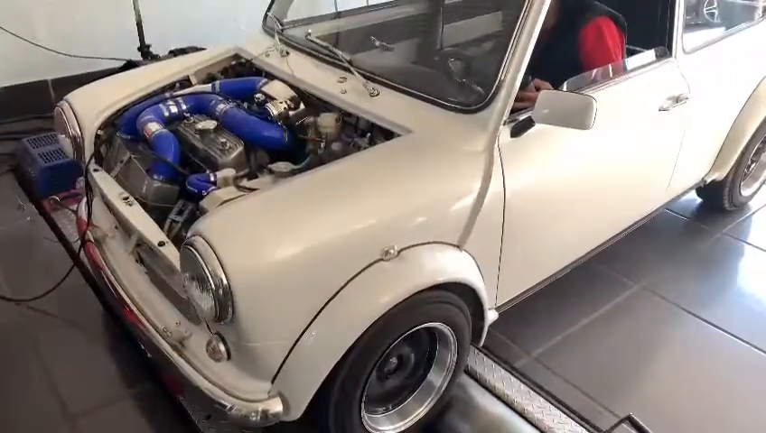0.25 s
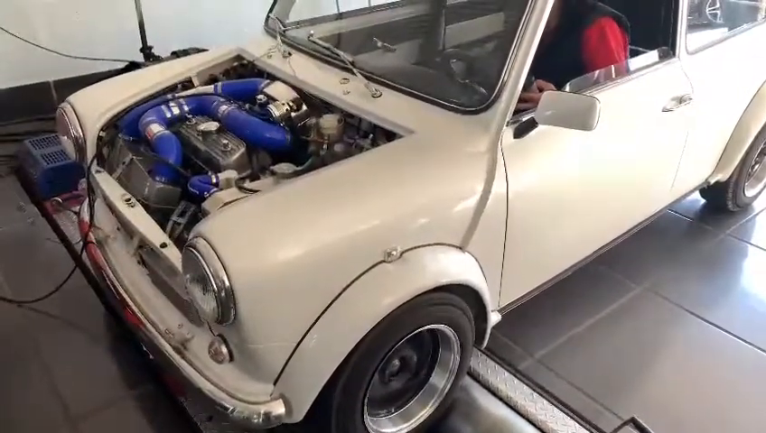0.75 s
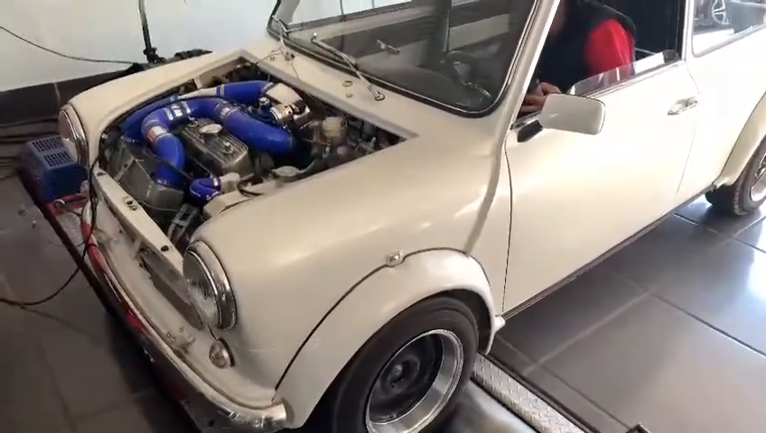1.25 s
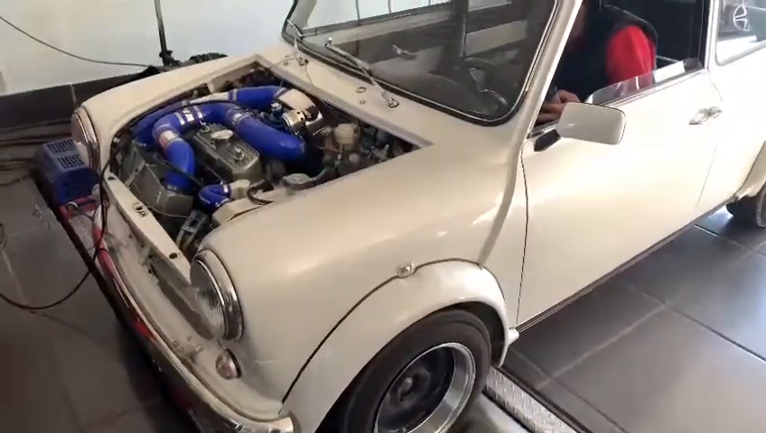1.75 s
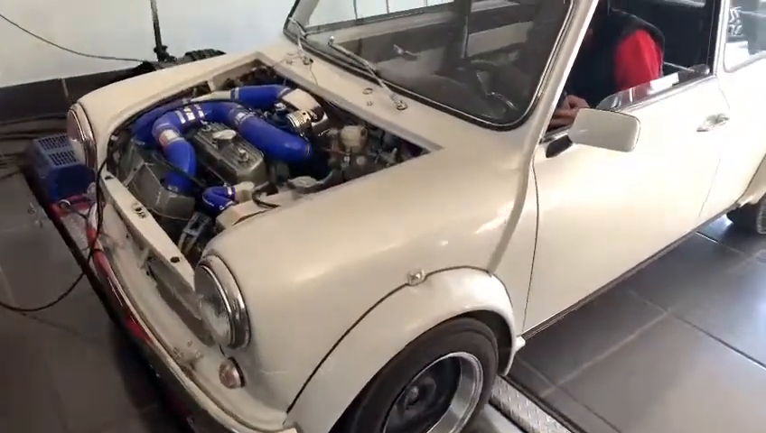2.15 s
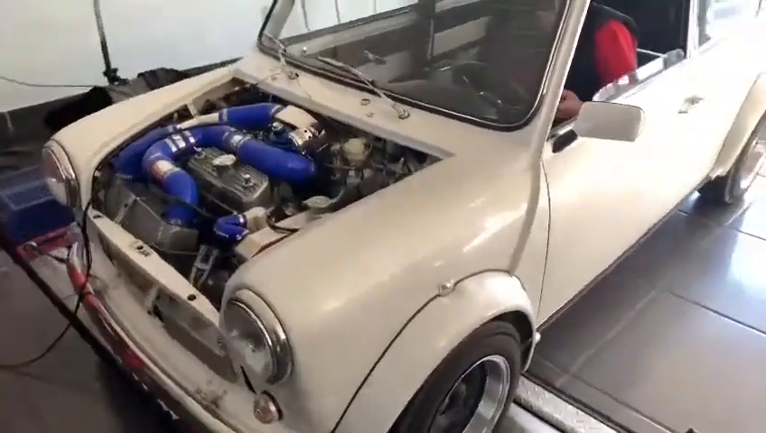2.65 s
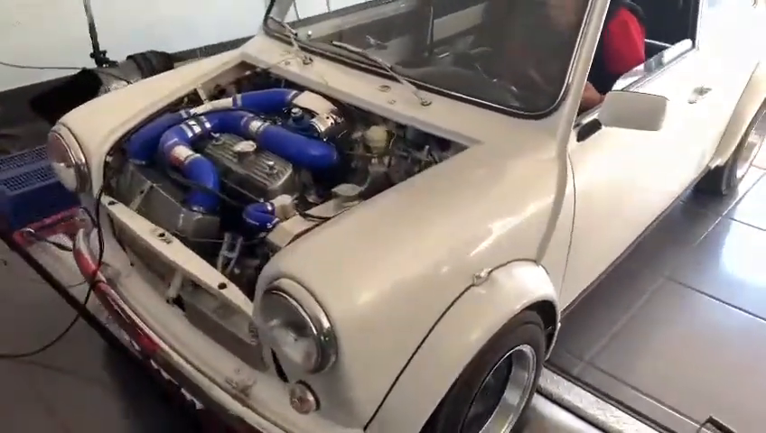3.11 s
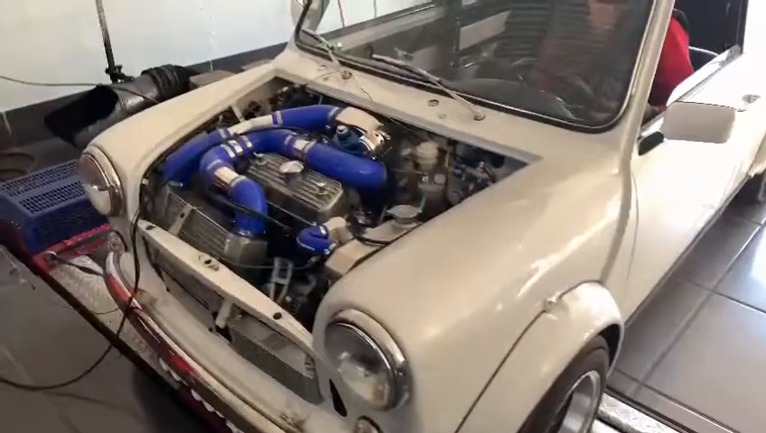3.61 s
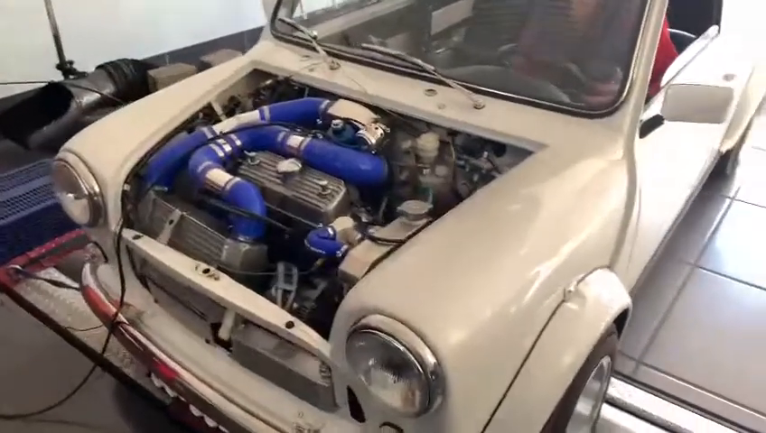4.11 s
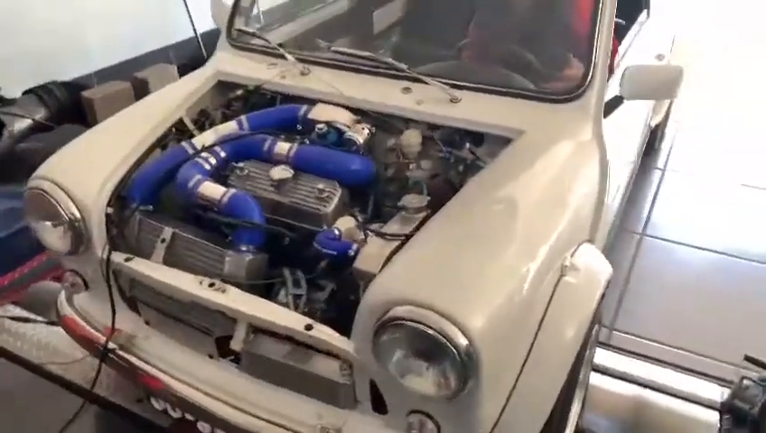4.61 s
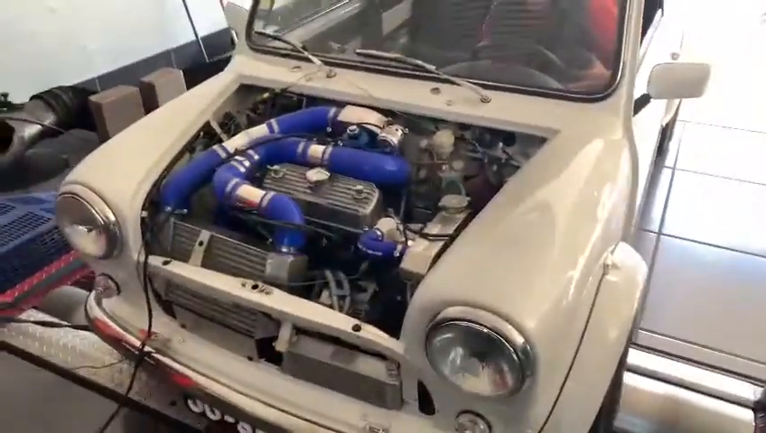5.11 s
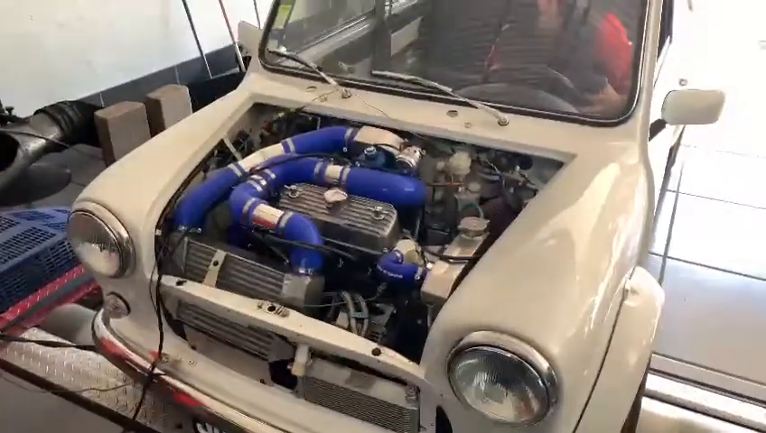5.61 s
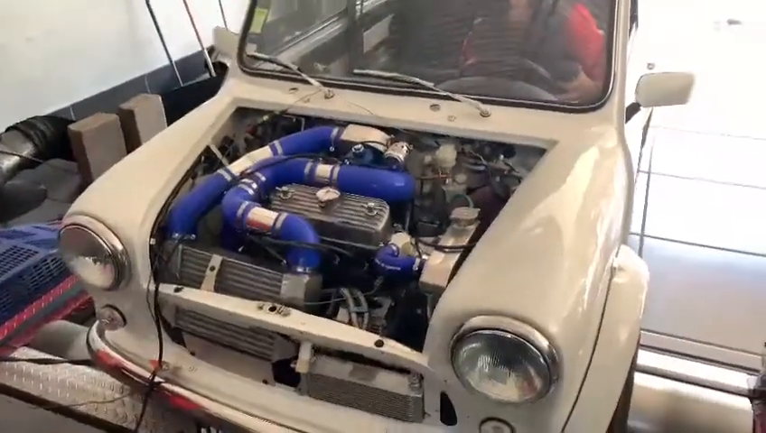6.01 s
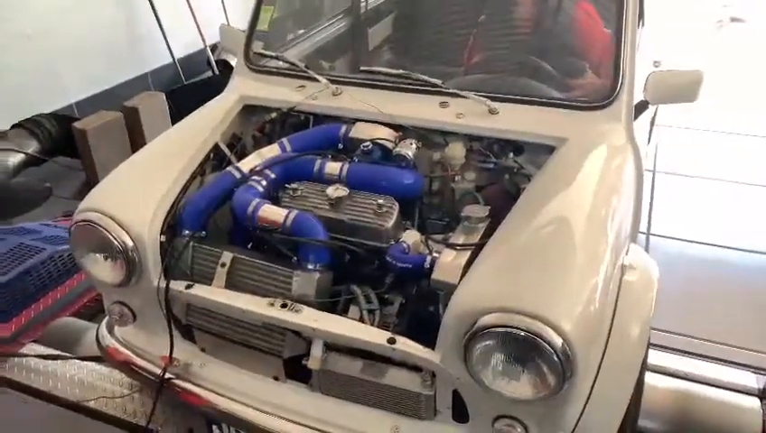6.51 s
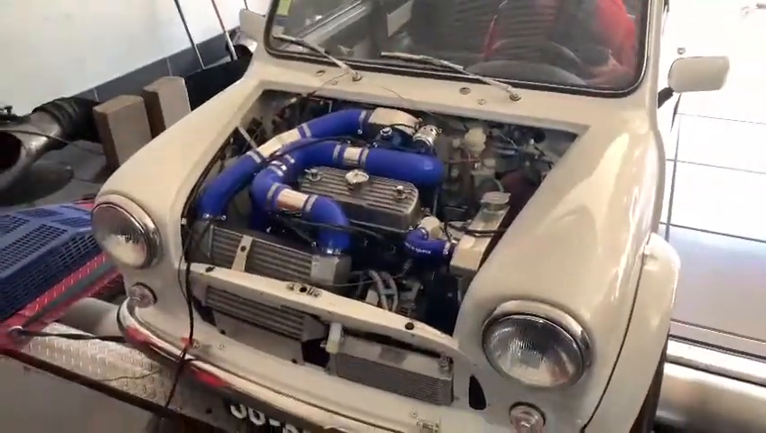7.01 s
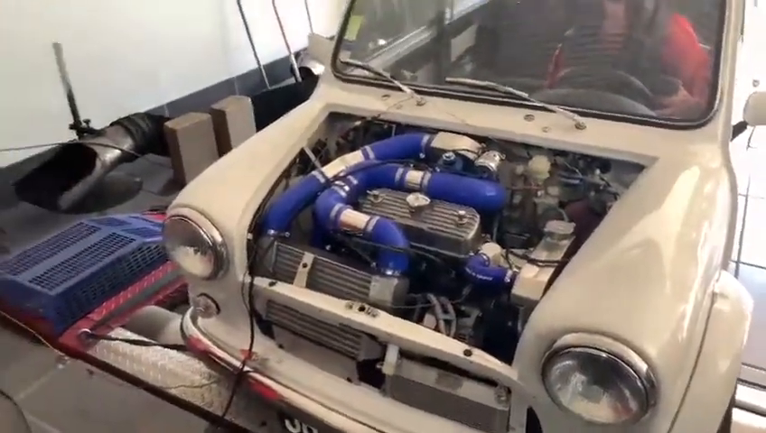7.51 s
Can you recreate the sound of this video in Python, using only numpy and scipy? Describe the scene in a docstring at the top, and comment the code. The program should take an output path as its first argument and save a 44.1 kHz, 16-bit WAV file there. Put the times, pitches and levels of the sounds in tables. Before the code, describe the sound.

Continuous close-up of a small four-cylinder engine idling briskly, never revving. Its rapid exhaust pulses fuse into a buzzing hum, with whirring gears, belt-drive tones, broadband mechanical rush and quick ticking clatter. A small stereo microphone starts beside the car, walks around the corner and settles in front, where the sound is a little less roary, brighter and hissier, with a slow beating hum.

```python
"""A small four-cylinder engine, bonnet off, runs at a fast idle in a tiled workshop, heard by two ports.
At first the listener stands beside the car: crank-locked sines make exhaust thump, gear whine and belt-drive
tones beating with crank orders; shaped noise makes roar and belt hiss; repeated noise patterns make clatter.
From 2.2 s the listener walks to the front, there at 5.5 s: single tones briefly swell or dip on the way,
the roar sinks a little and the hiss grows. Levels and port leads still drift until 7.6 s."""
import sys
import numpy as np
from scipy import signal
from scipy.fft import irfft
from scipy.io import wavfile
from scipy.ndimage import uniform_filter1d

SR = 44100
rng = np.random.default_rng(int(sys.argv[2]) if len(sys.argv) > 2 else 0)


def wav_out(sig):
    """Save sig, one row per channel (or a flat mono array), as 16-bit PCM at SR to the path in sys.argv[1]."""
    wavfile.write(sys.argv[1], SR, np.round(np.clip(np.atleast_2d(sig).T, -1, 1) * 32767).astype(np.int16))


N = 341775

# engine speed: (time [s], rate [firings/s])
SPEED = [(0.0, 41.603), (0.78, 41.61), (1.55, 41.584), (2.33, 41.579), (3.1, 41.565), (3.88, 41.582),
         (4.65, 41.62), (5.42, 41.645), (6.2, 41.671), (6.98, 41.646), (7.75, 41.617)]
# walk: leaving the car's side, at the wing, at the corner, in front, end: (time [s], ...)
STOPS_S = (2.2, 3.3, 4.4, 5.5, 7.6)

# exhaust orders: (firing multiple, ...)
EXHAUST_ORDERS = (2, 3, 4, 5, 6, 7, 8, 9, 10, 14)
# exhaust note, one row a stop: (level of each order [dB], ...)
EXHAUST_DB = [(-26, -29, -22, -34.5, -53, -41, -32, -54.5, -38.5, -36),
              (-31, -29.5, -19.5, -29, -33, -34.5, -30.5, -47.5, -38.5, -58),
              (-37, -31, -18.5, -29.5, -33.5, -31.5, -38.5, -46, -40.5, -45),
              (-47, -30, -30, -31.5, -34.5, -35, -34, -41, -46, -42),
              (-48, -30, -24, -34.5, -39.5, -36, -31.5, -43.5, -48, -43)]
# exhaust at the ports, one row an order:
# (side left-right [dB], side left lead [rad], front left-right [dB], front left lead [rad])
EXHAUST_EARS = [(-5, -.4, -10, -.6), (-3, -.1, -4, .3), (-3, -.2, -2, .9), (-1, -1.3, -4, -.5),
                (-1, .5, -5, -1.2), (-8, -1.2, -6, -.1), (-1, -.7, -5, .7), (-2, 0, -2, 0),
                (-1, 2.7, -4, -2.2), (-3, -.1, -1, 0)]
# thump shape, one row a stop: (turn [rad], delay [rad/order], smear [rad/order^2])
SMEAR = [(-3.5, 2.78, .4), (-4.2, 1.6, -.2), (-4.5, 1.36, -.33), (-4.3, 1.25, -.42), (-4.1, 1.25, -.44)]
# beyond this many orders above the strongest, smear goes from square to this slope
SMEAR_KNEE_ORDERS, SMEAR_SLOPE = 4, 6

# noise levels along the walk, before each source's make-up gain: (time [s], roar [dB], hiss [dB])
WALK = [(.1, -38, -43), (1.7, -37.5, -42.5), (2.6, -37.5, -40.5), (3.9, -38.5, -39.5), (5.2, -40, -38.5),
        (6.4, -40, -38), (7.65, -39.5, -38)]
# relative roar spectra beside the car, at its corner, in front: (frequency [Hz], density [dB per Hz])
ROAR_SIDE = [(15, -60), (25, -22), (58, -16), (165, -12.5), (208, -18.5), (270, -10.5), (342, -12),
             (394, -21.5), (575, -14), (879, -21.5), (1310, -18), (1620, -24.5), (1910, -18), (2370, -22),
             (5800, -28.5), (7000, -37), (9100, -96), (15400, -120)]
ROAR_CORNER = [(15, -68), (25, -18), (173, -9.5), (304, -9.5), (342, -17), (413, -13), (819, -23),
               (944, -17), (2310, -20.5), (2930, -21), (3370, -23.5), (5940, -23.5), (7000, 0), (9100, -83),
               (15400, -120)]
ROAR_FRONT = [(15, -60), (25, -18), (140, -7.5), (334, -11), (413, -17), (499, -11), (632, -16), (879, -18),
              (966, -13.5), (1040, -14.5), (1590, -18.5), (1910, -16), (2370, -18.5), (3880, -23),
              (4750, -19.5), (5550, -21.5), (7000, -18), (9100, -75), (15400, -120)]
# engine-bay resonances: (frequency [Hz], width [Hz], boost [dB])
RINGS = [(530, 25, 3), (1190, 250, 0), (1360, 200, 1), (2145, 62, 6), (2900, 730, 6.5), (3500, 180, 5),
         (3830, 250, 7.5), (5760, 21, 20)]
# roar at the ports: (frequency [Hz], likeness [0-1], left lead [rad], left-right [dB])
ROAR_PAIR = [(45, .85, 0, -1), (100, .68, -.1, -1.7), (200, .65, -.3, -3), (350, .75, .3, -3.5),
             (450, .5, .4, -1), (1100, .55, .6, 2), (1700, .2, 1.8, 0), (2400, .3, 3.3, -1),
             (2900, .35, 4.3, -1.5), (3500, .5, 3.3, -1), (4400, .55, 6.4, -1.5), (5600, .25, 4.6, -3.5),
             (6300, .4, 3.4, -1)]
ROAR_TOP_HZ = 6250  # hiss takes over above

TEETH, TOOTH_ORDERS = 23, (1, 2, 3, 4, 5, 6)  # tooth contacts per firing, their multiples
# gear whine, one row a stop: (level of each tooth multiple [dB], ...)
GEARS_DB = [(-46.5, -38, -34.5, -43, -47, -47), (-35.5, -33, -35.5, -48, -50, -48),
            (-30.5, -32.5, -37, -36, -49, -45), (-31.5, -33.5, -37.5, -42.5, -50, -45),
            (-28.5, -38, -41.5, -39.5, -45, -47)]
# gear balance, rows beside the car and in front: (left-right of each tooth multiple [dB], ...)
GEAR_PANS_DB = [(-1, -1, -2, -3, -2, -3), (1, -3, -2, -2, -2, -5)]
# gear phase, one row a stop: (left lead of each tooth multiple [rad], ...)
GEAR_LEADS_RAD = [(.9, -2.2, -2, 1.2, 0, .6), (.6, -2.8, -1, 2.2, 0, -1.7), (1.3, -3.1, -.9, 4.6, 0, -1.8),
                  (0, -5.3, -1.8, 4.6, 0, -3), (.4, -5.1, .2, 5.8, 0, -4)]
WOBBLE_TURNS = .309  # slow-shaft turns per firing
# orders that shake the gear train: (firing multiple, ...)
KICK_ORDERS = (1, 2, 3, 6)
# rock by each of those orders: (swing of the first tooth tone [rad], ...)
KICK_RAD = (0.028, 0.046, 0.031, 0.05)

# belt-drive tones and the two crank orders, 12 and 13.5, that beat with them: (firing multiple, ...)
BEATING_RATIOS = (12.048, 12, 13.595, 13.5, 16.368, 27.755)
# the same tones, one row a stop: (level of each tone [dB], ...)
BEATING_DB = [(-40, -50.5, -40, -67, -44.5, -44), (-39, -57, -38.5, -65, -53, -41),
              (-45, -67, -44.5, -48, -41, -41), (-28.5, -40, -35, -38, -42.5, -41),
              (-28, -40, -36, -48, -45, -40)]
# the same tones at the ports, one row a tone:
# (side left-right [dB], side left lead [rad], front left-right [dB], front left lead [rad])
BEATING_EARS = [(-1, 2.0, 0, .7), (1, .8, 0, .7), (3, .4, -3, -.1), (0, .5, 1, 0), (-1, .2, -5, .5),
                (2, 2.5, 2, .7)]
# a crest of each tone at the right port, wavering aside: (time [s], ...)
BEATING_CRESTS_S = (7.05, 7.05, 6.45, 6.45, 1, 1)

# relative hiss spectrum: (frequency [Hz], density [dB per Hz])
HISS = [(6000, -40), (6300, -2), (6630, 3), (6900, -1), (7150, -2), (7550, 1.5), (7900, -1), (8700, 0),
        (9700, -1.5), (10200, -4), (11000, -5.5), (11600, -8)]
# hiss at the ports, opposed or in step by pitch: (frequency [Hz], likeness [-1 to 1])
HISS_PAIR = [(6300, -.3), (6750, -.5), (6900, -1), (7500, -.98), (8150, 0), (8600, .99), (10100, 1),
             (10450, 0), (10900, -1)]
BELT_TURNS = .767  # pulley turns per firing

CLATTER_RATES = (WOBBLE_TURNS, .5, 1)  # slow shaft, crank, each firing: repeats per firing
# clatter, one row a part: (level [dB], spread of partials [dB], fade within a turn [neper])
CLATTER = [(-37, 5.5, 1.3), (-45, 5, .6), (-41, 3.5, 1.5)]
# relative clatter spectra, one list a part: (frequency [Hz], density [dB per Hz])
CLATTER_COLOURS = [
    [(300, -18), (420, 2), (600, 1.5), (900, 3.5), (1300, 0), (2000, -17.5), (3500, -6), (6200, -17)],
    [(300, -30), (420, -9), (700, 3), (1500, -22), (3000, -7), (6200, -6)],
    [(500, -28), (700, -4.5), (1200, 0.5), (2000, -2.5), (2900, -8), (4000, -13), (6200, 1)],
]
PLAY_S = 3e-5  # scale of early or late knocks
KNOCK_RISE_TURNS = .03  # time constant, in turns of the part

# faint shaft tones: (firing multiple, level beside the car [dB], level in front [dB])
FAINT = [(3.5, -49, -41), (11.0, -50, -45), (11.5, -41, -50), (12.97, -47, -46), (16.0, -46, -52),
         (17.0, -47, -54), (18.0, -48, -50), (20.0, -48, -46), (25.0, -44, -45), (28.08, -48, -45),
         (31.51, -46, -52), (32.44, -44, -47), (44.79, -51, -48), (49, -55, -51), (50, -55, -51),
         (51.75, -47, -49), (60, -55, -51), (61, -55, -52), (63, -54, -51), (71, -51, -49), (72, -50, -46),
         (75, -52, -48), (94, -53, -50)]
# brief swells and dips of tones near a pitch, at each port:
# (time [s], pitch [Hz], half length to 1/e [s], left change [dB], right change [dB])
SWELLS = [(2.22, 2872, 0.55, -5, -7.5), (2.54, 681, 0.18, 12, 7), (2.56, 1915, 0.47, 5, 4),
          (2.7, 1915, 0.2, 0, -16), (2.15, 3830, .3, 0, -2), (2.8, 620, 0.23, 2, -6),
          (2.93, 958, 0.18, 5, -1), (2.65, 958, .25, -5, -6), (4.3, 5745, .4, -7, -2),
          (4.87, 310, 0.25, 6, 5), (3.3, 478, 0.4, 3, 3), (2.61, 2872, .15, 4, 5), (3.3, 457, 0.13, 9, 7),
          (3.7, 360, 0.15, 11, 10), (3.5, 416, 0.8, 5, 2.5), (3.8, 390, .12, 6, 3),
          (3.2, 333, 0.77, -2.5, 4), (4.3, 333, 0.4, -16, -18), (3.7, 166, 0.74, -8.5, -1.5),
          (4.55, 166, 0.45, -21, -2.5), (4.5, 2872, 0.13, 5.5, 8), (4.78, 681, 0.14, 11, 4.5),
          (4.88, 958, 0.43, -7.5, -16), (5.04, 502, 0.2, 9.5, 6.5), (5.01, 1915, 0.35, 8.5, -2),
          (5.44, 2872, 0.37, -6.5, -9), (4.9, 3830, 0.48, -2.5, -7), (5.9, 681, 0.13, -2, -7),
          (4.6, 1915, .2, -7, -3.5), (2.03, 958, 0.26, 5, 8.5), (4.24, 958, 0.33, 1, -1.5),
          (3.28, 410, .13, 10, 10), (4.85, 2872, .2, -2, 0.5)]
EDGE_HZ = 11750  # recorder's band limit


def exhaust():
    """One thump a firing: pipe and floor turn, delay and smear its orders around the strongest."""
    turn, delay, smear = np.transpose(SMEAR)[:, :, None]
    step = np.array(EXHAUST_ORDERS) - 4  # from the strongest order
    beyond = (step - SMEAR_KNEE_ORDERS).clip(0)
    bend = np.minimum(step ** 2, SMEAR_KNEE_ORDERS ** 2 + SMEAR_SLOPE * beyond)
    start = np.unwrap(turn + delay * step + smear * bend, axis=0)  # slide the short way round
    return tones(EXHAUST_ORDERS, EXHAUST_DB, *paired(EXHAUST_EARS), walked(start),
                 waver_db=0.49, waver_rad=0.03, waver_hz=20)


def roar_shape(hz, t):
    """Roar spectrum [dB]: blend of three places along the walk, plus engine-bay rings."""
    places = (ROAR_SIDE, ROAR_CORNER, ROAR_FRONT)
    place_s = [STOPS_S[0], np.mean(STOPS_S[:-1]), STOPS_S[-2]]
    shares = [np.interp(t, place_s, one) for one in np.eye(len(places))]
    rings = sum(boost / (1 + (2 * (hz - f) / width) ** 2) for f, width, boost in RINGS)
    top_cut = 10 * np.log10(1 + (hz / ROAR_TOP_HZ) ** 120)
    blend = sum(across(p, hz).T * share for p, share in zip(places, shares))
    return blend + (rings - top_cut)[:, None] + along(WALK, t)[0]


def roar():
    """Intake, fan and block noise, ringing in the engine bay and puffing with each firing."""
    def same(hz):
        return across(ROAR_PAIR, hz)[0]

    def turn(hz):
        _, lead, pan_db = across(ROAR_PAIR, hz)
        return amp(pan_db) * np.exp(1j * lead)

    sound = noise(roar_shape, same, turn, patchy_db=2.5, comb_db=1.6)
    turns = 2 * np.pi * firings()
    puff = 1 + 0.012 * np.cos(turns) + 0.0092 * np.cos(2 * turns) + 0.038 * np.cos(4 * turns)
    puff = puff + 0.026 * np.cos(WOBBLE_TURNS * turns)
    return amp(12.5) * evened(sound) * amp(np.mean(WALK, axis=0)[1]) * puff


def gears():
    """Tooth-contact whine, fuzzy from turn-to-turn variation; firings and a slow shaft rock the teeth."""
    turns, order = 2 * np.pi * firings(), np.array(TOOTH_ORDERS)
    kicks = sum(rad * np.cos(k * turns + rng.uniform(0, 2 * np.pi)) for k, rad in zip(KICK_ORDERS, KICK_RAD))
    backlash = 0.084 * waver(count=1, hz=60.05)[0]  # shakes all multiples together
    rock_rad = 0.22 * np.cos(WOBBLE_TURNS * turns) + kicks + backlash
    start = rng.uniform(0, 2 * np.pi, (len(order), 1)) + order[:, None] * rock_rad
    slow_load = 0.15 * np.cos(WOBBLE_TURNS * turns + rng.uniform(0, 2 * np.pi))
    load = 1 + slow_load + 0.12 * np.cos(turns)
    return load * tones(TEETH * order, GEARS_DB, side_to_front(*GEAR_PANS_DB), GEAR_LEADS_RAD, start,
                        waver_db=1.5, waver_rad=0.17, waver_hz=22.12)


def beating_tones():
    """Belt-drive tones and the two crank orders that beat with them."""
    crest_firings = np.interp(BEATING_CRESTS_S, np.arange(N) / SR, firings())
    start = -2 * np.pi * np.multiply(BEATING_RATIOS, crest_firings)
    return tones(BEATING_RATIOS, BEATING_DB, *paired(BEATING_EARS), start,
                 waver_db=0.86, waver_rad=0.19, waver_hz=7.1)


def hiss():
    """Belt noise, throbbing with each pulley turn and less with each firing."""
    def shape(hz, t):
        return across(HISS, hz).T + along(WALK, t)[1]

    def same(hz):
        return across(HISS_PAIR, hz)[0]

    sound = noise(shape, same, np.ones_like, patchy_db=2.0, comb_db=-4.0)
    turns = 2 * np.pi * firings()
    belt = BELT_TURNS * turns
    throb = 1 + 0.09 * np.cos(belt) + 0.021 * np.cos(2 * belt) + 0.023 * np.cos(turns)
    return amp(6.5) * evened(sound) * amp(np.mean(WALK, axis=0)[2]) * throb


def clatter():
    """Each turning part repeats a random knocking pattern; each stop has its own, blended along the walk."""
    turns, out, size = firings(), np.zeros((2, N)), 16384  # size: points per pattern
    shares = np.sqrt(walked(np.eye(len(STOPS_S))))  # equal-power blend between stops
    late = turns + PLAY_S * SPEED[0][1] * waver(count=1, hz=18)[0]  # play in loose parts
    phase = np.arange(size) / size
    for rate, (db, spread_db, fade), colour in zip(CLATTER_RATES, CLATTER, CLATTER_COLOURS):
        hz = np.arange(size // 2 + 1) * rate * SPEED[0][1]
        same, lead, pan_db = across(ROAR_PAIR, hz)
        a, b, c, d, uneven = rng.standard_normal((5, len(STOPS_S), len(hz)))
        right = a + 1j * b
        left = same * right + np.sqrt(1 - same ** 2) * (c + 1j * d)
        left = left * amp(pan_db) * np.exp(1j * lead)
        partials = (hz < ROAR_TOP_HZ) * amp(across(colour, hz)[0] + spread_db * uneven)
        knock = irfft(np.array([left, right]) * partials)
        shape = np.exp(-fade * phase) + (np.exp(-fade) - 1) * np.exp(-phase / KNOCK_RISE_TURNS)
        knock = evened(knock * shape).astype(np.float32)
        place = (rate * late % 1 * size).astype(int)
        out += amp(db) * np.einsum("csn,sn->cn", knock[:, :, place], shares)
    return out


def faint_tones():
    """Weak orders and sidebands, wavering, with the roar's port balance and scattered leads."""
    multiple, beside, front = np.transpose(FAINT)
    _, lead, pan_db = across(ROAR_PAIR, multiple * SPEED[0][1])
    lead = lead + 2.02 * rng.standard_normal((len(STOPS_S), len(FAINT)))
    start = rng.uniform(0, 2 * np.pi, len(FAINT))
    return tones(multiple, side_to_front(beside, front), side_to_front(pan_db, pan_db), lead, start,
                 waver_db=0.22, waver_rad=0.095, waver_hz=10)


def tones(multiples, levels, pans, leads, start, waver_db, waver_rad, waver_hz):
    """Crank-locked sines, each with its own level along the walk and its own way to both ports."""
    turns, out = firings(), np.zeros((2, N))
    swings, slips = waver(2 * len(multiples), waver_hz).reshape(2, -1, N)
    rows = zip(multiples, walked(levels), walked(pans), walked(leads), start, swings, slips)
    for k, db, pan_db, lead, rad, swing, slip in rows:
        fuzz = (k / multiples[0]) ** 0.53  # higher multiples magnify the same unevenness
        angle = 2 * np.pi * k * turns + rad + waver_rad * fuzz * slip
        pan = amp(pan_db)
        right = np.sqrt(2 / (1 + pan ** 2))  # keeps the mean power of both ports
        level_db = db + waver_db * fuzz * swing + swells(k * SPEED[0][1])
        size = np.sqrt(2) * amp(level_db) * right  # levels are RMS
        out += size * np.array([pan * np.cos(angle + lead), np.cos(angle)])
    return out


def swells(hz):
    """Brief swells and dips [dB] at the left and right port for a tone at hz."""
    t, out = np.arange(N) / SR, 0
    for s, swell_hz, half, *db in SWELLS:
        if abs(np.log(swell_hz / hz)) < .008:
            out = out + np.outer(db, np.exp(-((t - s) / half) ** 2))
    return out


def noise(shape, same, turn, patchy_db, comb_db):
    """Two-port noise from random short-time spectra; shape(hz, t) gives dB."""
    frames, hz = N // 512 + 5, np.fft.rfftfreq(2048, 1 / SR)
    a, b, c, d, patches, comb = rng.standard_normal((frames, 1025, 6)).T  # each (frequency, frame)
    patches = uniform_filter1d(uniform_filter1d(patches, size=8, axis=0), size=2, axis=1)
    comb = uniform_filter1d(uniform_filter1d(comb, size=5, axis=0), size=90, axis=1)
    flicker = patchy_db * (1 + 0.2 * np.log(1 + hz / 2000))[:, None] * evened(patches)  # more in the treble
    ripple = comb_db * evened(comb)  # narrow random peaks and dips, shifting slowly
    same, right = np.clip(same(hz), -1, 1)[:, None], a + 1j * b
    left = (same * right + np.sqrt(1 - same ** 2) * (c + 1j * d)) * turn(hz)[:, None]
    level_db = shape(hz, np.arange(frames) * 512 / SR) + flicker + ripple
    spectra = np.array([left, right]) * amp(level_db)
    return signal.istft(spectra, nperseg=2048, noverlap=1536)[1][:, :N]


def firings():
    """Firing cycles completed at each sample."""
    return np.cumsum(along(SPEED, np.arange(N) / SR)[0]) / SR


def waver(count, hz):
    """Random drifts, one a row: lines between unit-variance knots, about 2 * hz knots a second."""
    steps = round(N / SR * 2 * hz) + 2
    knots = rng.standard_normal((count, steps))
    place = np.linspace(0, steps - 1, N)
    return np.array([np.interp(place, np.arange(steps), row) for row in knots])


def walked(rows):
    """Every column of a table with one row a stop, read at each sample."""
    return along(np.column_stack([STOPS_S, rows]), np.arange(N) / SR)


def side_to_front(beside, front):
    """Rows for the stops: even steps from the car's side to its front, then held."""
    return np.vstack([np.linspace(beside, front, len(STOPS_S) - 1), front])


def paired(ears):
    """Left-right dB and left lead at each stop."""
    pan_side, lead_side, pan_front, lead_front = np.transpose(ears)
    return side_to_front(pan_side, pan_front), side_to_front(lead_side, lead_front)


def along(table, t):
    """Every column of a table, read at times t."""
    s, *columns = np.transpose(table)
    return np.array([np.interp(t, s, c) for c in columns])


def across(table, hz):
    """Every column of a table, read on a log-frequency axis."""
    return along([(np.log(f), *rest) for f, *rest in table], np.log(hz + 1))


def amp(db):
    """Amplitude ratio of a level in dB."""
    return np.exp(np.asarray(db) * (np.log(10) / 20))


def evened(x):
    """Scaled to unit RMS."""
    return x / np.sqrt(np.mean(x ** 2) + 1e-20)


def scene():
    """All sources summed at the two ports."""
    return exhaust() + roar() + gears() + beating_tones() + hiss() + clatter() + faint_tones()


def record(dry):
    """A small microphone loses the deepest bass; then the recorder's band limit."""
    lean = signal.sosfilt(signal.butter(2, 36.0, "high", fs=SR, output="sos"), dry)
    band = signal.firwin(511, EDGE_HZ, window=("kaiser", 9), fs=SR)
    return signal.oaconvolve(lean, band[None], "same")


dry = scene()
out = record(dry)
wav_out(out)
```